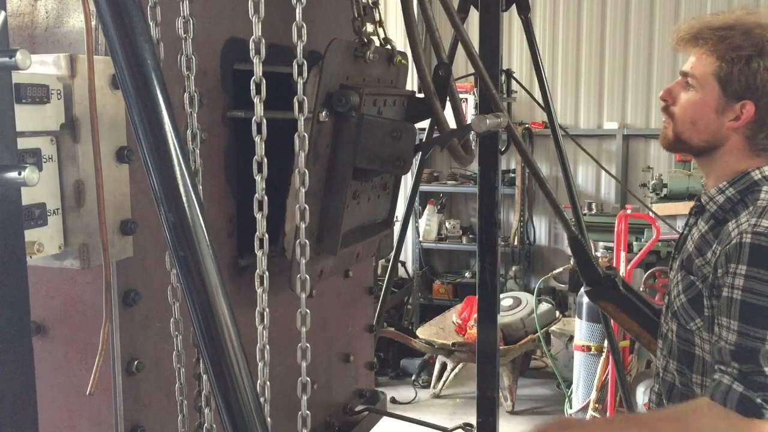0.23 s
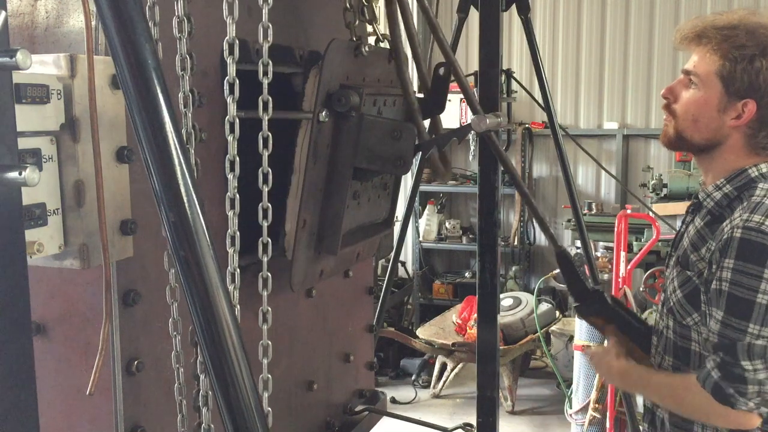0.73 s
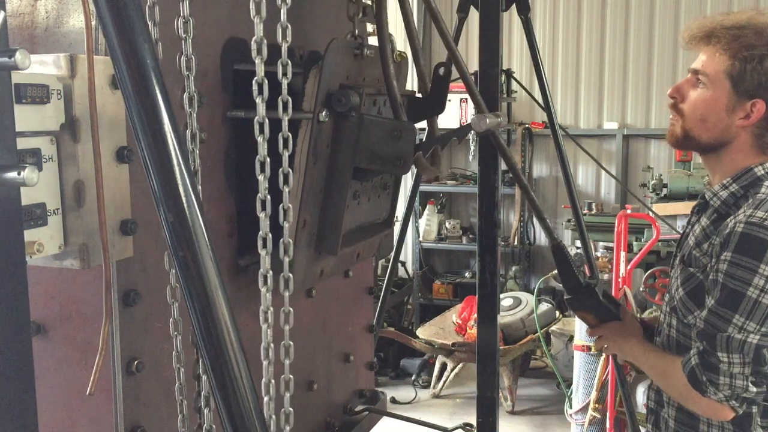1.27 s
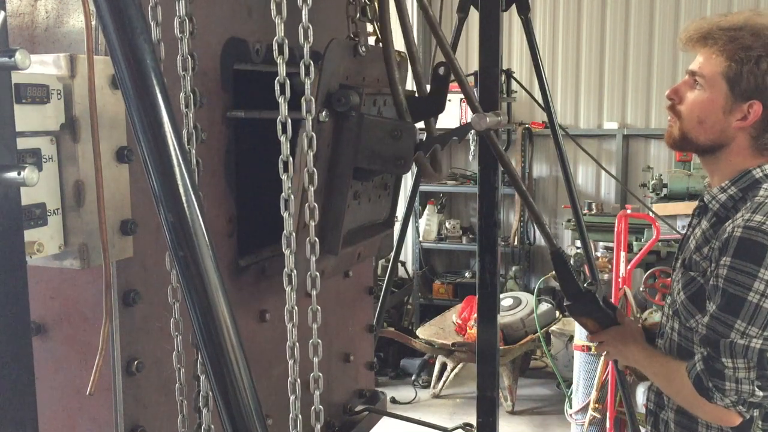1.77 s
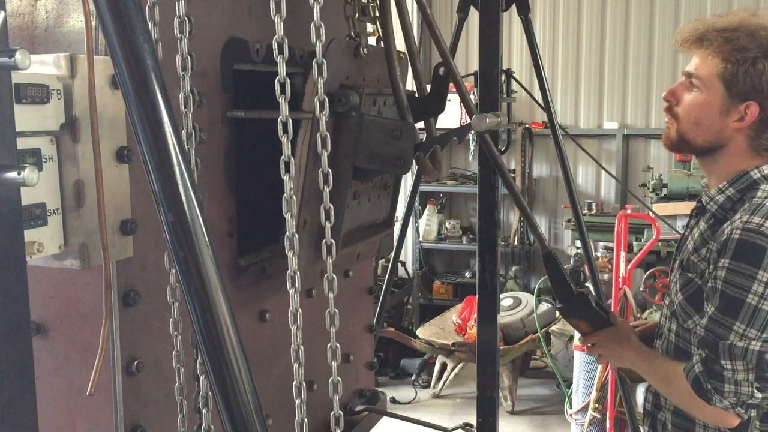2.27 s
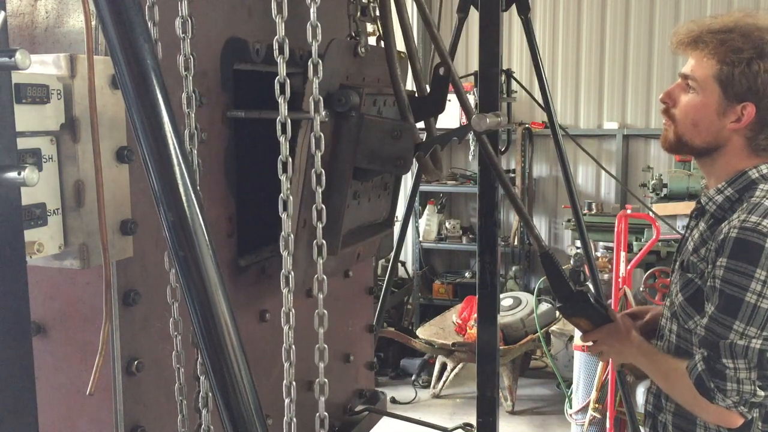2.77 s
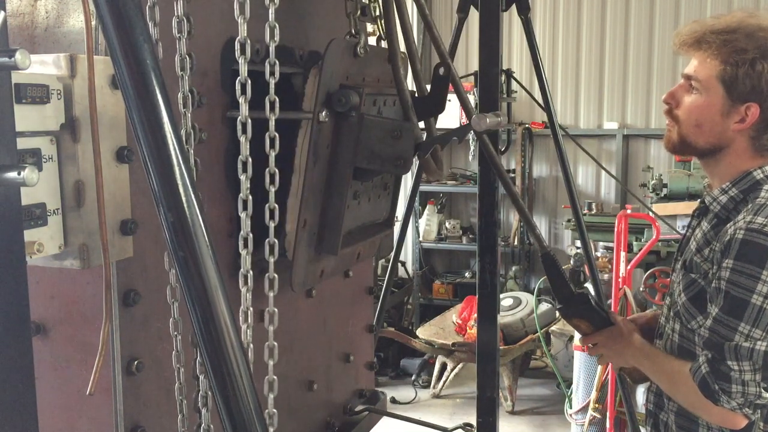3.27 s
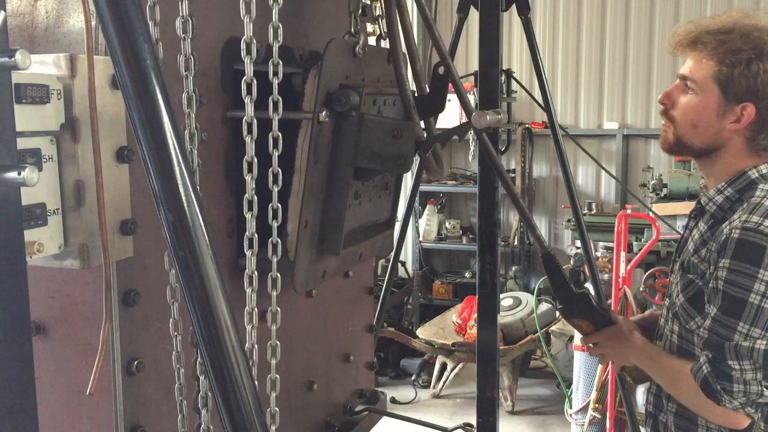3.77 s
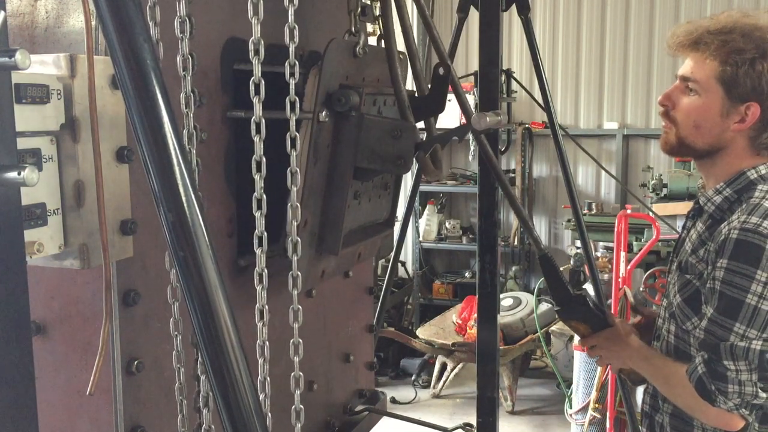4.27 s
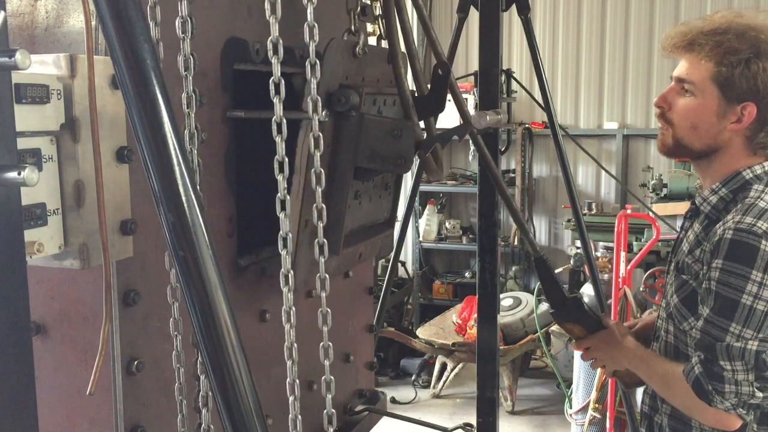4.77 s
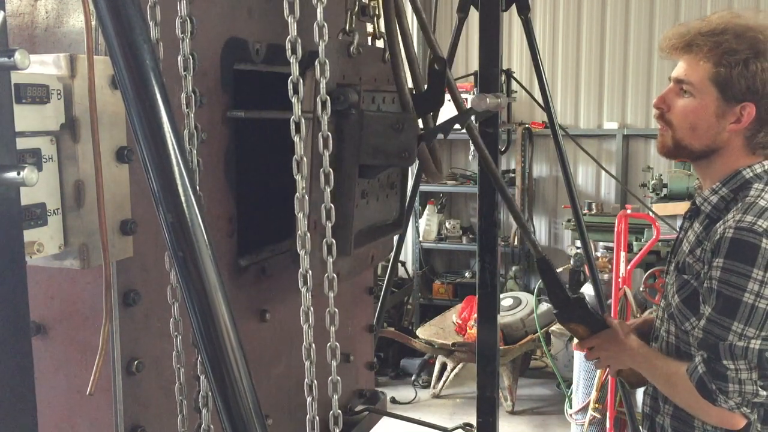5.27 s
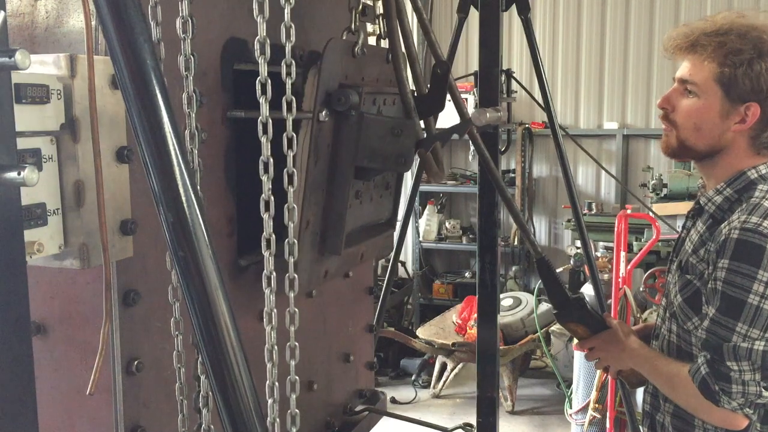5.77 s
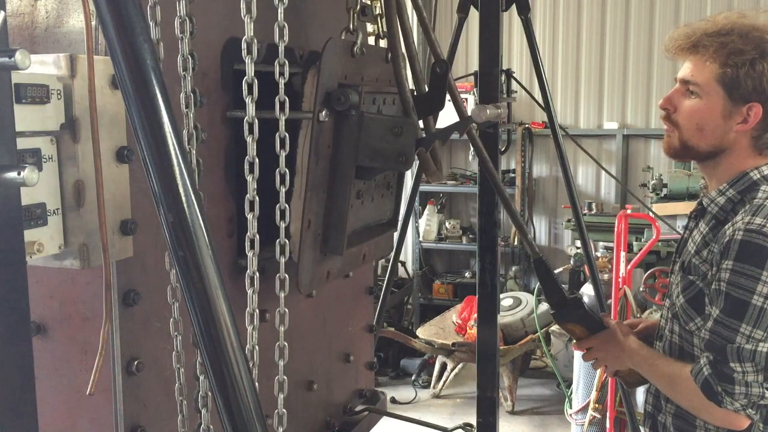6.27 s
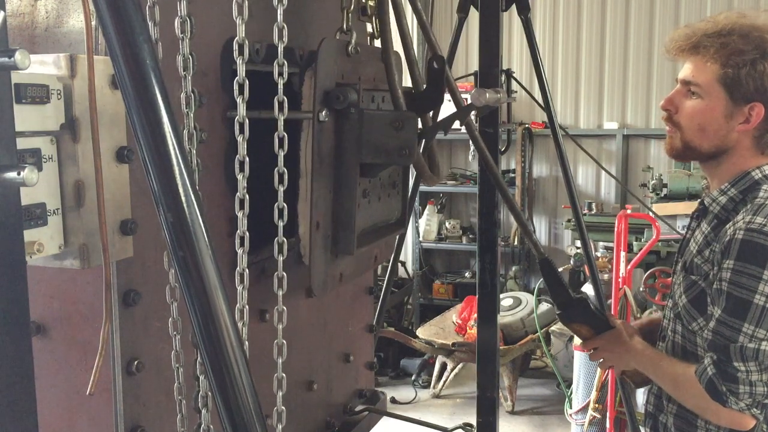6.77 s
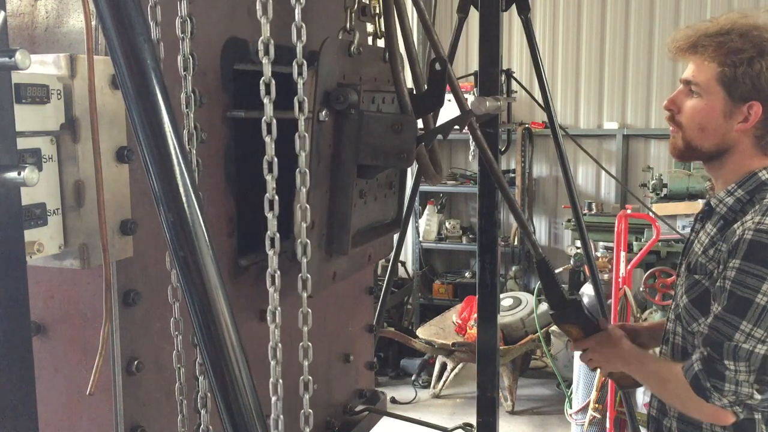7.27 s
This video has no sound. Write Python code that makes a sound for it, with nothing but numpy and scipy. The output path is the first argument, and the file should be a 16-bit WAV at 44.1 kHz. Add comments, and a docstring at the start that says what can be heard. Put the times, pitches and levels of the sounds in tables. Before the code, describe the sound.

A heavy steel door on a chain hoist is heaved repeatedly, thumping, grinding, squealing and clanking against a boiler in an echoing workshop.

```python
"""A heavy steel boiler door hangs on a chain hoist in a reverberant workshop and is heaved again and again.
Early on, chain is paid out in a long rattle, and links clink between the first heaves.
In each heave two ticks take up the slack and snap the chain taut; the door thumps free, grinds and squeals,
and nearly always lands edge after edge. Contact bursts and stick-slip drive resonant steel.
Dull clunks of the settling tackle and a few hook squeaks fall in between; faint air and a low hum lie below."""
import sys
import numpy as np
from scipy import signal
from scipy.fft import rfft, irfft
from scipy.io import wavfile

SR = 44100
rng = np.random.default_rng(int(sys.argv[2]) if len(sys.argv) > 2 else 0)


def int16_out(signal):
    """Quantize to a 16-bit WAV file."""
    q = np.round(np.clip(np.atleast_2d(signal).T, -1, 1) * 32767)
    wavfile.write(sys.argv[1], SR, q.astype(np.int16))


N = 331191

# heaves of the door: start_s, slack_lead_s (tick this long before), slide_s, weight_db, squeal_db
HEAVES = [(.128, 0.038, 0.14, 0, -46), (.438, .01, .04, -4.5, -42.5), (1.224, 0.011, 0.14, -1, -39),
          (2.819, .027, 0.083, 0.5, -55.5), (3.523, 0.029, 0.086, 1.5, -35.5), (4.497, 0.035, .04, 2, -38),
          (5.127, 0.017, 0.12, 1.5, -40), (6.607, 0.023, 0.074, 1.5, -34)]
# door landing against the boiler: start_s, rock_s (from edge to edge), level_db, weight_db (thud only)
LANDINGS = [(.226, 0.013, -32.5, -34), (1.314, .01, -25, -1), (2.879, .012, -21, -1.5),
            (3.553, 0.016, -30, 2.5), (4.538, .008, -21, 4), (5.198, .011, -25, 1), (6.656, 0.02, -28, -13)]
# one edge, the other, then the whole face: delay (in rocking times), level_db, snap_db, thud_db (both relative)
ROCKING = [(0, -0.5, 9.5, -1), (1, 0.5, 14, 7), (2.45, -4, 13.5, 12)]
# swinging door bumping the boiler in passing: start_s, level_db, snap_db, thud_db (both relative)
BUMPS = [(.174, -25.5, 4, 9.5), (.304, -31, 10.5, -2), (0.438, -35, 12, -1), (1.415, -26.5, 8, 2),
         (2.86, -27.5, 7.5, 13), (6.629, -24.5, 3, 4.5)]
# broad response of the door plate: frequency_hz, density_db (per Hz, relative)
PLATE_SPECTRUM = [(45, -21), (80, -14.5), (115, -17), (200, -2), (470, -10), (650, -0.5), (1200, -6),
                  (2000, -8), (2800, -11), (3700, -7.5), (4900, -17.5), (8300, -26), (10200, -35),
                  (15500, -38.5)]
# resonances of the door: frequency_hz, width_hz, level_db (relative to each other)
DOOR_MODES = [(102, 6, -6.5), (133, 19, 14.0), (189, 6, 2.7), (245, 13, 4.4), (300, 18, 5.7),
              (372, 66, 6.5), (431, 10, 5.7), (518, 7, 3.5), (608, 7, 6.2), (636, 6, -4.0), (659, 6, -12.0),
              (679, 7, 4.8), (743, 6, -3.8), (797, 6, -2.6), (973, 70, 1.7), (1079, 6, -2.4),
              (1270, 12, 4.4), (1378, 70, -1.9), (1472, 11, 3.6), (1636, 70, -2.9), (1752, 45, 2.3),
              (1879, 70, 1.9), (2021, 40, -0.4), (2113, 54, 9.0), (2211, 6, -2.1), (3318, 6, -1.5),
              (3617, 10, -7.2), (3856, 70, -8.8)]
# plate tone left ringing after some heaves: start_s, level_db
LINGERING = [(2.88, -53.5), (5.2, -51)]
# hook squeaks: start_s, length_s, start_hz, end_hz, level_db, waver (rms share of pitch)
SQUEAKS = [(0.541, 0.057, 1890, 1896, -38.5, 0.044), (0.937, 0.094, 1923, 1857, -58, 0.0044),
           (1.175, 0.03, 2370, 2350, -67, 0.017), (7.426, 0.067, 2020, 2130, -70, 0.038)]
# broad response of the running chain: frequency_hz, density_db (per Hz, relative)
CHAIN_SPECTRUM = [(200, -8), (1500, 7), (3700, 13), (5200, -11.5), (8600, 2), (10200, -10.5), (12000, -4),
                  (15500, -14)]
# links clinking: start_s, level_db, tilt_db_per_octave (brightness of the modes)
CLINKS = [(.437, -33, -3.5), (0.508, -56, 38.5), (.575, -21, -2), (.858, -58.5, 61), (1.416, -37.5, -2)]
# resonances of one link: frequency_hz, width_hz, level_db (before the tilt)
LINK_MODES = [(640, 60, -13), (1770, 130, 0), (2060, 90, -2), (3340, 110, -3), (3520, 130, 1),
              (3800, 180, -2), (4124, 110, -8), (5250, 170, -5), (6950, 220, -10), (7350, 220, -10),
              (8300, 300, -11), (10500, 60, -22), (11350, 90, -16)]
# tackle settling: start_s, level_db, dull_above_hz
CLUNKS = [(.627, -26.5, 2400), (.857, -44.5, 1510), (1.053, -51, 2620), (1.646, -30, 3380),
          (1.794, -44.5, 1630), (2.123, -42.5, 990), (2.594, -54.5, 3200), (3.059, -43, 1880),
          (3.752, -47.5, 1214), (5.592, -55.5, 2400), (6.786, -55, 1380), (7.353, -57.5, 1260)]
# broad response of the tackle: frequency_hz, density_db (per Hz, relative)
TACKLE_SPECTRUM = [(80, -10), (250, -7.5), (550, -1), (1250, 0), (2400, -9.5), (3300, -11.5), (5500, -26),
                   (15000, -32.5)]
# resonances of the tackle: frequency_hz, width_hz, level_db (gain over its broad response)
TACKLE_MODES = [(580, 23, -4), (1250, 120, -7.5), (1790, 98, 4), (2400, 73, 4)]
# reverberation of the shed: frequency_hz, t60_s
SHED_T60 = [(100, 0.45), (250, 0.53), (700, 0.63), (2000, 0.63), (4000, 0.52), (8000, 0.47), (11000, 0.23),
            (16000, 0.19)]
# colour of the workshop air: frequency_hz, density_db (per Hz, relative)
AIR_SPECTRUM = [(18, -36), (30, -4.5), (108, -2), (225, -12.5), (292, -10.5), (432, -19), (728, -20),
                (852, -19.5), (1020, -22), (1400, -27), (2180, -25.5), (2620, -26), (15500, -41.5)]

# ticks of slack and of the taut chain; the snap is the bright part relative to the rest
SLACK_DB, TAUT_DB, TAUT_LEAD_S, TICK_SNAP_DB = -49, -36.5, .0045, 12.5
# thump and judder also follow the weight of each heave
THUMP_DB, JUDDER_DB, BREAK_DB, GRIND_DB = -12, -34.5, -31.5, -39
JUDDER_SLIPS_PER_S, JUDDER_RELEASE_S = 150, 0.35
GRIND_SLIPS_PER_S, GRIND_RELEASE_S = 390, .19
SNAP_T60_S, CLATTER_T60_S = 0.0098, 0.053
DOOR_RING_DB = -2.5
LINGERING_HZ, LINGERING_T60_S = 743, 1.48
SQUEAL_HZ, SQUEAL_S = 2150, 0.039
# chain over the wheel: starts just before each heave, lasts a share of the slide
RUN_DB, RUN_LEAD_S, RUN_SHARE = -46.5, .008, 0.865
PAYOUT_AT_S, PAYOUT_S, PAYOUT_DB = .086, 0.487, -50
LINK_SNAP_DB = -6.5  # relative to the clink
ROOM_DB, ROOM_BUILD_S = -5.5, 0.0068
AIR_DB, HUM_HZ, HUM_DB = -67.5, 89.7, -89.5
CUTOFF_HZ = 15600


def from_db(db):
    """Decibels to gain."""
    return 10 ** (np.asarray(db) / 20)


def at_hz(points, hz):
    """Read a table on a log-frequency axis."""
    f, value = np.transpose(points)
    return np.interp(np.log(np.maximum(hz, 1)), np.log(f), value)


def add(track, s, sound):
    """Mix a sound in at time s."""
    start = max(round(s * SR), 0)
    track[start:start + len(sound)] += sound[:N - start]


def seconds(length):
    """Time axis of a short sound."""
    return np.arange(int(length * SR)) / SR


def unit(response):
    """Scale to an energy of one."""
    return response / np.sqrt(np.sum(response ** 2))


def through(x, response):
    """Pass a force or sound through an impulse response."""
    return signal.fftconvolve(x, response)[:N]


def cut(x, hz, kind, order=2):
    """Butterworth low- or high-pass."""
    sos = signal.butter(order, min(hz, .45 * SR), kind, fs=SR, output="sos")
    return signal.sosfilt(sos, x + 1e-18)


def body(spectrum, size=16384):
    """Causal (minimum-phase) impulse response with the given spectrum."""
    hz = np.arange(size // 2 + 1) * SR / size
    cepstrum = irfft(np.log(from_db(at_hz(spectrum, hz))))
    # fold the cepstrum forward in time to get minimum phase
    cepstrum[1:size // 2] *= 2
    cepstrum[size // 2 + 1:] = 0
    return unit(irfft(np.exp(rfft(cepstrum))))


def resonate(x, hz, width):
    """Two-pole resonance with a gain of one on top."""
    r = np.exp(-np.pi * width / SR)
    zeros = np.array([1, 0, -1]) * (1 - r * r) / 2
    poles = [1, -2 * r * np.cos(2 * np.pi * hz / SR), r * r]
    return signal.lfilter(zeros, poles, x)


def dying(t, t60):
    """Exponential decay by 60 dB in t60 seconds."""
    return np.exp(-np.log(1000) * t / t60)


def stroke(t, length, rise, release):
    """Envelope that rises, holds for a length and dies."""
    return (1 - np.exp(-t / rise)) * dying(np.maximum(t - length, 0), release)


def crack(t60, rise=0.00045):
    """One contact: a dense cluster of short-lived vibrations that spreads through the steel."""
    t = seconds(.2)
    return rng.standard_normal(len(t)) * stroke(t, 0, rise, t60)


def slips(t, per_s, jitter, spread_db, t60):
    """Stick-slip: an uneven train of small contacts, rms 1."""
    gaps, sizes = rng.standard_normal((2, 1000))
    at = (np.cumsum(np.exp(jitter * gaps)) / per_s * SR).astype(int)
    inside = at < len(t)
    clicks = np.zeros(len(t))
    clicks[at[inside]] = from_db(spread_db * sizes[inside])
    envelope = signal.lfilter([1], [1, -dying(1 / SR, t60)], clicks)
    return unit(envelope * rng.standard_normal(len(t))) * np.sqrt(len(t))


def thud(contact_s, bounce_hz, t60, count=8):
    """A heavy soft contact: the door bounces in smooth humps of force, the first only grazing."""
    t = seconds(.12)
    gaps = np.exp(.1 * rng.standard_normal(count)) / bounce_hz
    at = np.r_[0, np.cumsum(gaps)]
    since = np.maximum(t - at[:, None], 0)
    strength = dying(at, t60) * np.where(at == 0, .5, 1)
    return unit(strength @ (since * np.exp(-since / contact_s)))


def heaving():
    """Force of each heave: a thump, a harsh break, then coarse judder and fine grinding as the door slides."""
    force, t = np.zeros(N), seconds(.4)
    for s, _, slide_s, weight_db, _ in HEAVES:
        thump = thud(contact_s=0.00075, bounce_hz=126.6, t60=0.081)
        add(force, s, from_db(THUMP_DB + weight_db) * thump)

        breaking = cut(crack(t60=0.12, rise=0.0073), 450, "high")
        add(force, s, from_db(BREAK_DB) * breaking)

        judder = cut(slips(t, JUDDER_SLIPS_PER_S, jitter=.34, spread_db=3.5, t60=.065), 820, "low")
        judder *= stroke(t, slide_s, rise=.002, release=JUDDER_RELEASE_S)
        add(force, s, from_db(JUDDER_DB + weight_db) * judder)

        grind = cut(slips(t, GRIND_SLIPS_PER_S, jitter=0.46, spread_db=0, t60=0.029), 400, "high")
        grind *= stroke(t, slide_s, rise=.002, release=GRIND_RELEASE_S)
        add(force, s, from_db(GRIND_DB) * grind)
    return force


def knocking():
    """Force of steel on steel, in landings and bumps: a sharp snap, a clatter and a low thud."""
    knocks = list(BUMPS)
    for s, rock_s, db, weight_db in LANDINGS:
        for delay, contact_db, snap_db, thud_db in ROCKING:
            knocks.append((s + delay * rock_s, db + contact_db, snap_db, thud_db + weight_db))
    force = np.zeros(N)
    for s, db, snap_db, thud_db in knocks:
        snap = cut(crack(SNAP_T60_S, rise=0.00036), 2600, "high", order=1)
        clatter = cut(crack(CLATTER_T60_S, rise=0.0012), 1000, "high", order=1)
        low = thud(contact_s=0.00074, bounce_hz=164.5, t60=0.095)
        add(force, s, from_db(db + snap_db) * snap)
        add(force, s, from_db(db) * clatter)
        add(force, s, from_db(db + thud_db) * low)
    return force


def tightening():
    """Force of the two ticks before each heave: the slack goes, then the chain snaps taut."""
    force = np.zeros(N)
    for s, slack_lead_s, *_ in HEAVES:
        for lead, db in (slack_lead_s, SLACK_DB), (TAUT_LEAD_S, TAUT_DB):
            snap = cut(crack(t60=0.021, rise=0.00015), 6600, "high", order=1)
            rattle = cut(crack(t60=0.15, rise=0.0014), 270, "high", order=1)
            add(force, s - lead, from_db(db + TICK_SNAP_DB) * snap)
            add(force, s - lead, from_db(db) * rattle)
    return force


def door(force):
    """The plate answers every force with its broad response and its own resonances."""
    plate = body(PLATE_SPECTRUM)
    rings = sum(from_db(db) * resonate(plate, hz, width) for hz, width, db in DOOR_MODES)
    return through(force, unit(plate + from_db(DOOR_RING_DB) * rings))


def lingering():
    """One lightly damped plate mode sings on as a decaying sine."""
    out, t = np.zeros(N), seconds(1.7)
    tone = np.sin(2 * np.pi * LINGERING_HZ * t) * dying(t, LINGERING_T60_S)
    for s, db in LINGERING:
        add(out, s, from_db(db) * tone)
    return out


def squeal(t, hz, waver, waver_hz):
    """A friction tone of rms 1 whose pitch wavers at random, below waver_hz."""
    wobble = unit(cut(rng.standard_normal(len(t)), waver_hz, "low")) * np.sqrt(len(t))
    phase = 2 * np.pi * np.cumsum(hz * (1 + waver * wobble)) / SR
    return np.sqrt(2) * np.sin(phase)


def squeals():
    """Steel sings roughly at the start of each slide, and the hook squeaks under load."""
    out, t = np.zeros(N), seconds(.3)
    for s, *_, db in HEAVES:
        tone = squeal(t, SQUEAL_HZ, waver=.018, waver_hz=160)
        add(out, s, from_db(db) * tone * stroke(t, SQUEAL_S, rise=0.006, release=0.031))
    for s, length, start_hz, end_hz, db, waver in SQUEAKS:
        glide_hz = np.interp(t, [0, length], [start_hz, end_hz])
        tone = squeal(t, glide_hz, waver, waver_hz=148)
        add(out, s, from_db(db) * tone * stroke(t, length, rise=0.014, release=0.079))
    return out


def chain():
    """Links rattle over the wheel in a dense stream of tiny contacts, paying out and with every heave."""
    force, t = np.zeros(N), seconds(.7)
    runs = [(PAYOUT_AT_S, PAYOUT_S, PAYOUT_DB)]
    for s, _, slide_s, *_ in HEAVES:
        runs.append((s - RUN_LEAD_S, RUN_SHARE * slide_s, RUN_DB))
    for s, length, db in runs:
        rattle = slips(t, per_s=600, jitter=.6, spread_db=3.5, t60=.018)
        add(force, s, from_db(db) * rattle * stroke(t, length, rise=.0015, release=0.051))
    return through(force, body(CHAIN_SPECTRUM))


def clinks():
    """A link snaps on its neighbour, chatters and rings; the lightest touches excite only the top modes."""
    out, t = np.zeros(N), seconds(.2)
    impulse = (t == 0) * 1.0
    for s, db, tilt_db in CLINKS:
        link = np.zeros(len(t))
        for k, (hz, width, mode_db) in enumerate(LINK_MODES):
            gain = from_db(mode_db + tilt_db * np.log2(hz / 5000))
            link += gain * resonate(impulse, hz, width) * (-1) ** k  # neighbouring modes in opposite phase
        chatter = crack(t60=0.043, rise=0.00044)
        snap = cut(crack(t60=0.016, rise=0.0006), 4000, "high", order=1)
        add(out, s, from_db(db) * through(chatter, unit(link)))
        add(out, s, from_db(db + LINK_SNAP_DB) * snap)
    return out


def tackle():
    """Dull, short clunks as the load settles; the gentler the clunk, the softer and longer it is."""
    force, block = np.zeros(N), body(TACKLE_SPECTRUM)
    for s, db, dull_hz in CLUNKS:
        gentle = np.interp(db, [-42, -28], [1, 0])
        contact = crack(t60=0.082 + 0.043 * gentle, rise=0.0011 + 0.00085 * gentle)
        add(force, s, from_db(db) * cut(contact, dull_hz, "low"))
    rings = sum(from_db(db) * resonate(block, hz, width) for hz, width, db in TACKLE_MODES)
    return through(force, unit(block + rings))


def shed_tail(build_s, count=12):
    """Diffuse reverberation that builds up quickly and dies band by band."""
    t = seconds(0.92)
    noise = rfft(rng.standard_normal(len(t)))
    bins = np.arange(len(noise))  # about 1.09 Hz apart, read as roughly 1 Hz each
    centres = np.geomspace(80, 16000, count)
    tail = np.zeros(len(t))
    for centre, band in zip(centres, np.eye(count)):
        weight = at_hz(np.c_[centres, band], bins)  # overlapping triangles on log frequency
        tail += irfft(noise * weight, len(t)) * dying(t, at_hz(SHED_T60, centre))
    return unit(tail * (1 - np.exp(-t / build_s)))


def shed(x):
    """Reverberation of the shed, with a fresh random tail drawn for the stretch from each heave to the next."""
    out = np.zeros(N)
    edges = [0] + [round(row[0] * SR) for row in HEAVES[1:]] + [N]
    for start, end in zip(edges, edges[1:]):
        wet = signal.fftconvolve(x[start:end], shed_tail(ROOM_BUILD_S))
        add(out, start / SR, from_db(ROOM_DB) * wet)
    return out


def background():
    """Still air of the workshop as coloured noise, with a weak, wavering hum."""
    air = through(rng.standard_normal(N), body(AIR_SPECTRUM))
    hum = squeal(np.arange(N) / SR, HUM_HZ, waver=0.0076, waver_hz=4)
    return from_db(AIR_DB) * air + from_db(HUM_DB) * hum


def scene():
    """Door, chain and tackle share one shed; squeals and clunks send a little less into the room."""
    steel = door(tightening() + heaving() + knocking()) + chain() + clinks()
    singing, settling = squeals(), tackle()
    room = shed(steel + from_db(-4.5) * singing + from_db(-0.5) * settling)
    mix = steel + singing + settling + room + lingering() + background()
    return mix[None]


def record(dry):
    """The microphone loses the deepest bass; the top is cut steeply."""
    thinned = cut(dry, 43, "high", order=5)
    top_cut = signal.ellip(10, .1, 70, CUTOFF_HZ, fs=SR, output="sos")
    return signal.sosfilt(top_cut, thinned)


dry = scene()
out = record(dry)
int16_out(out)
```